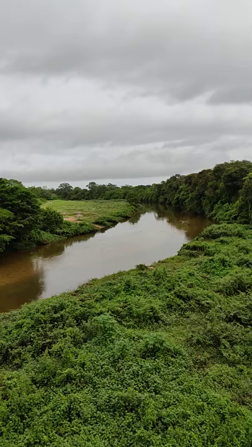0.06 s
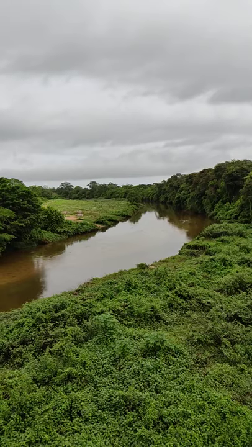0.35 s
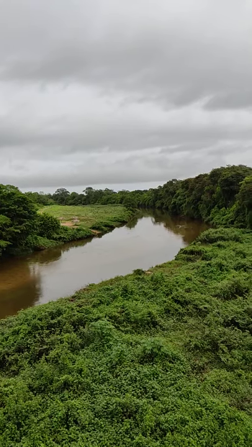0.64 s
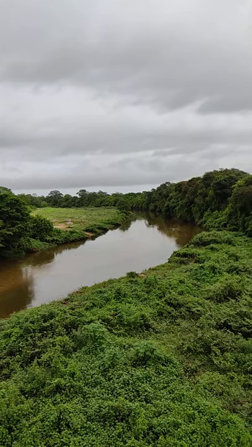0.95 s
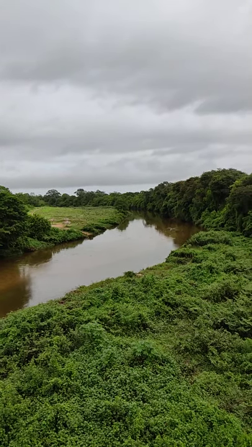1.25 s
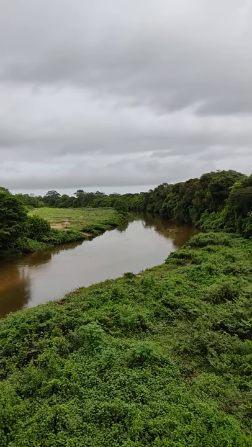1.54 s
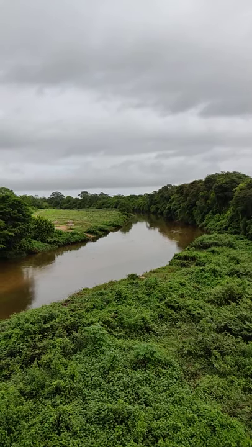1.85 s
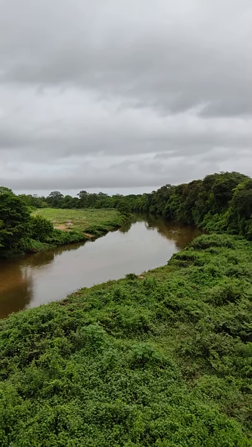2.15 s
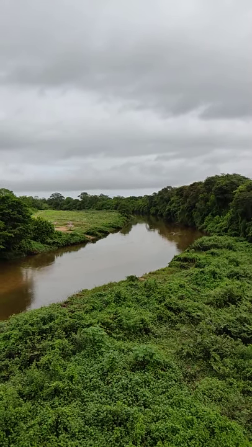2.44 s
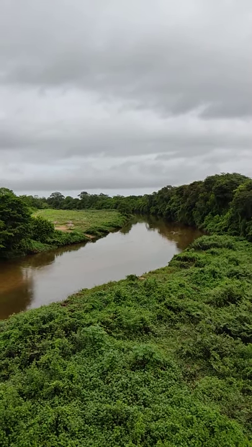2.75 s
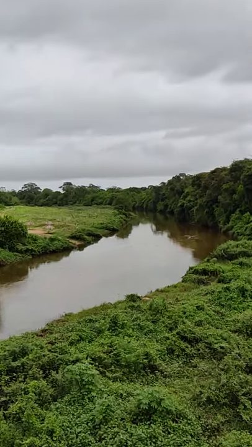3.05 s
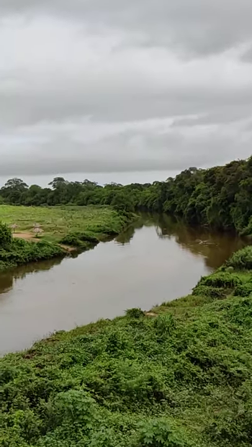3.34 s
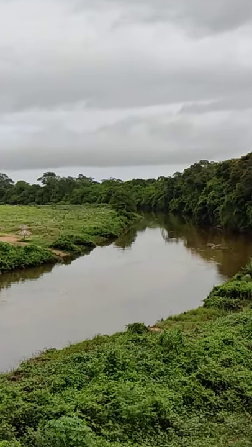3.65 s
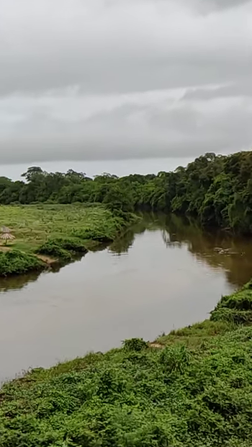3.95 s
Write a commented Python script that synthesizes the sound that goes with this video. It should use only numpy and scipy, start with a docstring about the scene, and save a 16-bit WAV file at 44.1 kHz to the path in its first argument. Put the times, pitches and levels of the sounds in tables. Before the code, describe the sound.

A cackling chorus of wood-rails opens with low hoots and hoarse clucks, then adds whoops, piping notes and cracked yelps that echo from riverside trees. Insects buzz steadily, small birds twitter far off, and light wind brushes the microphone.

```python
"""Low hoots and hoarse clucks open a cackling chorus of wood-rails in the thickets beside a river;
arched whoops, level piping notes and cracked yelps join in and scatter back from the trees. Each call
is a nearly pure tone of the syrinx, coloured by throat resonance and roughened by irregular vibration.
Insects buzz steadily in several high bands, small birds twitter far off, and under it all lie open air,
a faint low drone and light wind on the microphone."""
import sys
import numpy as np
from scipy import signal
from scipy.fft import rfft, irfft
from scipy.io import wavfile

SR = 44100
rng = np.random.default_rng(int(sys.argv[2]) if len(sys.argv) > 2 else 0)


def file_out(sig):
    """Save sig as 16-bit WAV at sys.argv[1]."""
    # one column per channel
    cols = np.atleast_2d(sig).T
    # limit, then scale
    lim = np.clip(cols, -1, 1)
    pcm = np.round(lim * 32767).astype(np.int16)
    wavfile.write(sys.argv[1], SR, pcm)


N = 176400
TIME = np.arange(N) / SR
FREQS = np.arange(N // 2 + 1) * SR / N


def from_db(db):
    """Amplitude grows tenfold with every 20 dB."""
    return 10 ** (np.asarray(db) / 20)


def progress(length_s):
    """Normalised time runs from 0 to 1 through a note."""
    return np.linspace(0, 1, int(length_s * SR))


def filtered(x, gains):
    """Linear filtering multiplies the spectrum by a gain at each frequency."""
    return irfft(rfft(x) * gains, len(x))


def noise(gains, size=N):
    """White noise takes on the spectrum of its filter; the result has rms 1."""
    x = filtered(rng.standard_normal(size), gains)
    return x / np.sqrt(np.mean(x ** 2))


def band(hz, width_hz, size=N):
    """Noise in a Gaussian band, rms 1; centred on 0 Hz it is a random modulation."""
    freqs = np.arange(size // 2 + 1) * SR / size
    return noise(np.exp(-.5 * ((freqs - hz) / width_hz) ** 2), size)


def place(x, pan_db, lag_ms=0):
    """Interaural differences give direction: the left ear leads by pan_db in level and lag_ms in time."""
    gains = from_db([pan_db / 2, -pan_db / 2])
    right = np.interp(TIME - lag_ms / 1000, TIME, x)
    return np.array([x, right]) * gains[:, None] / gains.mean()


def open_air(level_db=-57.5, pan_db=5.5, corner_hz=1900):
    """Coherence between the ears falls with frequency: the bass leans left, the treble is diffuse."""
    # Each row: frequency in Hz, relative spectral level in dB.
    spectrum = [(25, 1), (190, -6), (400, -12.5), (1100, -10.5), (2200, -17), (3500, -19), (4300, -21),
                (11000, -41), (15500, -36.5)]
    hz, db = np.transpose(spectrum)
    colour = from_db(np.interp(np.log(FREQS + 1), np.log(hz), db))
    bass = 1 / (1 + (FREQS / corner_hz) ** 2) ** 2
    coherent = place(filtered(noise(colour), bass), pan_db)
    diffuse = np.array([filtered(noise(colour), from_db(side * bass * pan_db / 2)) for side in (1, -1)])
    return from_db(level_db) * (coherent + diffuse)


def drone(width_hz=4.1):
    """Very narrow bands of noise are heard as low, wavering tones."""
    # Each row: centre frequency in Hz, level in dB.
    partials = [(46, -63), (89, -64.5), (178, -73)]
    return sum(from_db(db) * band(hz, width_hz) for hz, db in partials)


def gust(peak_s=.44, width_s=0.12, level_db=-40.5, ripple_hz=40):
    """Wind on the microphone makes one slow dip in pressure, rippled by turbulence."""
    ripple = 1 + 0.092 * band(0, ripple_hz)
    return -from_db(level_db) * ripple * np.exp(-((TIME - peak_s) / width_s) ** 2)


def insects(flicker_hz=37.4, flicker_db=0.86):
    """Countless insects add incoherently into flickering noise bands, different at each ear."""
    # Each row: centre in Hz, half width in Hz, left level in dB, right level in dB.
    choruses = [(5181, 239, -52.5, -50), (6327, 328, -52.5, -47), (7370, 410, -65.5, -56),
                (8520, 446, -52, -58), (5037, 16, -64, -61.5), (6240, 22, -62.5, -60)]
    buzz = np.zeros((2, N))
    for hz, width_hz, left_db, right_db in choruses:
        for ear, db in enumerate((left_db, right_db)):
            buzz[ear] += band(hz, width_hz) * from_db(db + flicker_db * band(0, flicker_hz))
    return buzz


def far_twitter(hz=2780, width_hz=520, flicker_hz=12.2, flicker_db=2.6):
    """The songs of small distant birds blur into one band of amplitude-modulated noise."""
    # Each row: time in seconds, level in dB.
    levels = [(1.3, -69), (1.9, -63), (3.1, -60), (4.0, -62)]
    db = np.interp(TIME, *np.transpose(levels)) + flicker_db * band(0, flicker_hz)
    return from_db(db) * np.array([band(hz, width_hz) for _ in range(2)])


def far_chirps(first_s=2.066, every_s=0.18, count=8, length_s=0.028, from_hz=3250, to_hz=2103):
    """A small far bird repeats a thin chirp, an exponential sweep down in frequency."""
    u = progress(length_s)
    hz = from_hz * (to_hz / from_hz) ** u
    envelope = from_db(-59.5) * np.sqrt(2 * np.abs(np.sin(np.pi * u)))
    chirp = envelope * np.sin(2 * np.pi * np.cumsum(hz) / SR)
    starts = first_s + every_s * np.arange(count)
    return sum(np.interp(TIME, start + u * length_s, chirp, left=0, right=0) for start in starts)


def trees(calls, level_db=-9, t60_s=0.62, build_s=0.0067):
    """Multiple scattering from the wooded banks builds a reverberation that decays exponentially."""
    t = TIME[:SR]
    echoes = rng.standard_normal((2, SR)) * from_db(-60 * t / t60_s) * (1 - np.exp(-t / build_s))
    echoes /= np.sqrt(np.sum(echoes ** 2, axis=1, keepdims=True))
    return from_db(level_db) * signal.fftconvolve(calls, echoes, axes=1)[:, :N]


def syrinx(notes, second_db, third_db, rasp_hz=161, flutter_hz=40, throat_hz=3230, throat_width_hz=370):
    """Source and filter: the throat favours overtones near its resonance; roughness modulates the tone."""
    calls = np.zeros(N)
    # Each note: start in seconds, pitch curve in Hz, amplitude, roughness from 0 to 1.
    for start, hz, gain, rough in notes:
        size = len(hz)
        t = np.arange(size) / SR
        jitter = np.tanh(band(0, rasp_hz, size))
        shimmer = np.tanh(band(0, rasp_hz, size))
        flutter = band(0, flutter_hz, size)
        phase = 2 * np.pi * np.cumsum(hz * (1 + 0.12 * rough * jitter + 0.0068 * flutter)) / SR
        hiss = rough * from_db(-22) * band(hz=3200, width_hz=350, size=size)
        tone = np.sin(phase) + hiss
        richness = (from_db(-46) / np.max(gain)) ** 0.54  # louder notes are purer
        overtones = [(1.5, rough * from_db(2.5)),  # roughness adds a partial between the harmonics
                     (2, richness * from_db(second_db)), (3, richness * from_db(third_db))]
        for ratio, strength in overtones:
            throat = np.exp(-.5 * ((ratio * hz - throat_hz) / throat_width_hz) ** 2)
            tone += strength * throat * np.sin(ratio * phase)
        rasp = np.exp(rough * shimmer) * from_db(1.1 * flutter)
        rasp /= np.sqrt(np.mean(rasp ** 2) / 2)  # brings the modulated fundamental to rms 1
        attack = np.clip(t / 0.0017, 0, 1)
        release = np.clip((t[-1] - t) / 0.0036, 0, 1)
        at = int(start * SR) + np.arange(size)
        calls[at[at < N]] += (tone * gain * attack * release * rasp)[at < N]
    return calls


def yelps(second_s=0.079, second_hz=1730, second_db=-3, second_rough=0.42):
    """Biphonation: one tone leaps up, holds and cracks downward while a hoarse level one outlasts it."""
    # Each row: start in seconds, level in dB, roughness from 0 to 1.
    notes = [(.768, -51.5, .08), (1.738, -49.5, .08), (2.811, -50.5, .1), (3.172, -47, .27),
             (3.954, -47.5, .3)]
    # Each row: time into the yelp in seconds, pitch in Hz.
    contour = [(0, 1720), (.008, 2138), (.037, 1983), (.042, 1420), (.055, 1177)]
    times, pitches = np.transpose(contour)
    hz = np.interp(progress(times[-1]) * times[-1], times, pitches)
    for start, db, rough in notes:
        yield start, hz, from_db(db), rough
        yield start, np.full(int(second_s * SR), second_hz), from_db(db + second_db), second_rough


def clucks(arch=0.224, skew=0.725, swell=0.047):
    """Brief pitch arches rise fast and fall more slowly; random modulation turns squeaks into cackles."""
    # Each row: start in seconds, length in seconds, top pitch in Hz, level in dB, roughness from 0 to 1.
    notes = [(0.168, 0.047, 1740, -53, 0.65), (0.251, 0.049, 1784, -55, 0.55),
             (.295, 0.063, 921, -51.5, 0.56), (.397, 0.041, 1824, -42, 0.1),
             (0.406, 0.095, 1186, -49, 0.05), (0.417, 0.04, 1633, -48, 0.4), (0.475, 0.04, 1770, -49, 0.34),
             (0.496, 0.032, 1593, -45.5, 0.5), (.525, 0.039, 1575, -50, 0.62),
             (.828, 0.056, 935, -49.5, 0.57), (1.28, 0.058, 907, -49.5, 0.35),
             (1.404, 0.036, 1041, -47.5, 0.5), (1.414, 0.05, 814, -54, 0.2),
             (1.465, 0.028, 1215, -51.5, 0.6), (1.499, .04, 1612, -54.5, 0.57),
             (1.99, 0.074, 1014, -49, 0.65), (2.059, 0.047, 1291, -52.5, 0.62),
             (2.415, 0.039, 1778, -45, 0.35), (2.455, 0.11, 1562, -51, 0.66),
             (2.502, 0.053, 1570, -47.5, 0.3), (2.681, 0.1, 1472, -53.5, 0.58),
             (3.409, 0.14, 1450, -52, 0.47)]
    for start, length, top_hz, db, rough in notes:
        u = progress(length)
        hz = top_hz * (1 - arch * (2 * u ** skew - 1) ** 2)
        yield start, hz, from_db(db) * np.abs(np.sin(np.pi * u)) ** swell, rough


def hoots(sharp=0.1003, settle=3.67, swell=0.15, rough=0.2):
    """Low notes start sharp, swell and settle in pitch by exponential relaxation."""
    # Each row: start in seconds, length in seconds, settled pitch in Hz, level in dB.
    notes = [(.072, 0.044, 973, -44.5), (0.146, 0.11, 870.4, -50), (0.66, 0.12, 863.5, -49),
             (1.226, 0.05, 885, -50.5), (1.731, 0.038, 927, -50), (1.808, 0.11, 872, -49),
             (2.109, 0.071, 888, -52.5), (2.399, 0.058, 903, -50.5), (2.455, 0.1, 841, -46),
             (2.668, .12, 715, -58), (2.74, 0.0554, 888, -50), (3.06, 0.085, 1010, -56),
             (3.171, 0.105, 865, -43), (3.45, .058, 710, -55), (3.504, 0.067, 887, -51.5),
             (3.81, 0.063, 910, -52.5), (3.887, 0.093, 978, -44)]
    for start, length, settled_hz, db in notes:
        u = progress(length)
        hz = settled_hz * (1 + sharp * np.exp(-settle * u))
        yield start, hz, from_db(db) * np.abs(np.sin(np.pi * u)) ** swell, rough


def pipes(droop_power=9, rough=0.061):
    """Nearly periodic vibration gives clear notes that glide slightly and droop as they stop."""
    # Each row: start and length in seconds, the glide's first and last pitch in Hz, level in dB,
    # final droop as a share of the pitch.
    notes = [(0.969, 0.14, 1133, 1179, -49.5, 0.012), (1.344, 0.095, 1222, 1277, -45, 0.066),
             (2.353, 0.09, 1202, 1265, -46, 0.14), (2.768, .062, 1291, 1231, -35.5, 0.069),
             (3.53, 0.062, 1258, 1212, -36, 0.075)]
    for start, length, first_hz, last_hz, db, droop in notes:
        u = progress(length)
        glide_hz = first_hz + (last_hz - first_hz) * u
        yield start, glide_hz * (1 - droop * u ** droop_power), from_db(db), rough


def whoops(scoop=0.15, crest_width_s=0.044, fall=0.21, fade_db=66, rough=0.079):
    """Frequency and amplitude vary together: each whoop scoops up to its loudest point and falls away."""
    # Each row: start, crest and end in seconds, pitch at the crest in Hz, level at the crest in dB.
    notes = [(0.6, 0.638, .668, 1619, -43), (0.834, 0.908, .955, 1724, -39),
             (1.587, 1.62, 1.66, 1657, -44.5), (1.807, 1.868, 1.922, 1706, -38.5),
             (2.624, 2.661, 2.69, 1623, -43), (2.884, 2.956, 2.99, 1640, -38),
             (3.253, 3.279, 3.315, 1630, -40.5), (3.652, 3.682, 3.714, 1610, -44.5)]
    for start, crest, end, hz, db in notes:
        t = start - crest + progress(end - start) * (end - start)  # zero at the crest
        rising = scoop * (1 - np.exp(-(t / crest_width_s) ** 2))
        falling = fall * (t / (end - crest)) ** 3
        drop = np.where(t < 0, rising, falling)  # share of the crest pitch
        yield start, hz * (1 - drop), from_db(db - fade_db * drop), rough


def scene():
    """Superposition: four wood-rail voices and their echoes add to far birds, insects and moving air."""
    rails = place(syrinx(whoops(), second_db=-13.5, third_db=-43), pan_db=0, lag_ms=0.13)
    rails += place(syrinx(pipes(), second_db=-44, third_db=-17.5), pan_db=7.5, lag_ms=-1.58)
    rails += place(syrinx(hoots(), second_db=-17, third_db=-18), pan_db=5)
    rails += place(syrinx([*clucks(), *yelps()], second_db=-19, third_db=-20.5), pan_db=5.5)
    wildlife = rails + trees(rails) + far_chirps() + far_twitter() + insects()
    return wildlife + open_air() + place(drone() + gust(), pan_db=5.5)


def record(dry, cutoff_hz=15700):
    """A rising gain fades the sound in, and a steep low-pass filter removes the highest treble."""
    # Each row: time in seconds, gain in dB.
    fade_in = [(.058, -65), (.073, -19.5), (.14, -11.5), (.29, -3)]
    faded = dry * from_db(np.interp(TIME, *np.transpose(fade_in)))
    return signal.sosfilt(signal.ellip(10, .1, 70, cutoff_hz, fs=SR, output="sos"), faded)


dry = scene()
out = record(dry)
file_out(out)
```